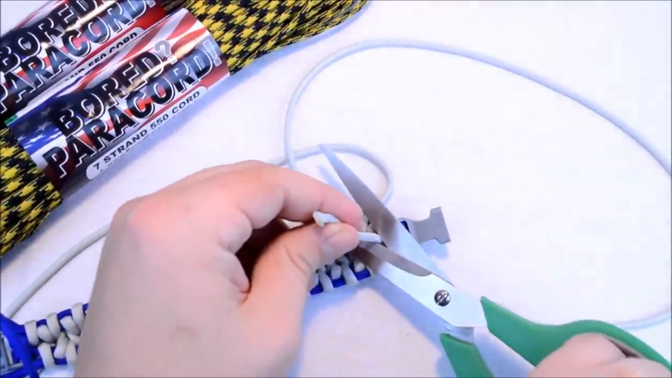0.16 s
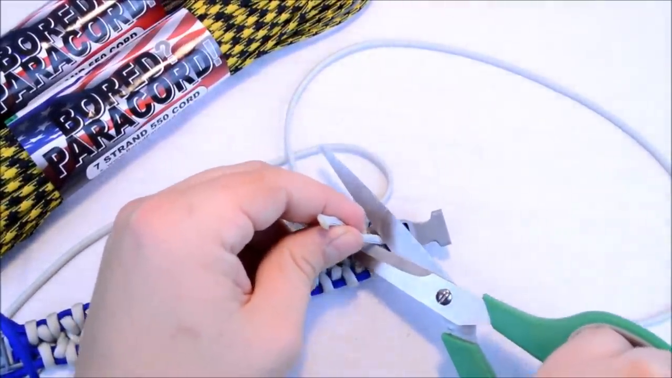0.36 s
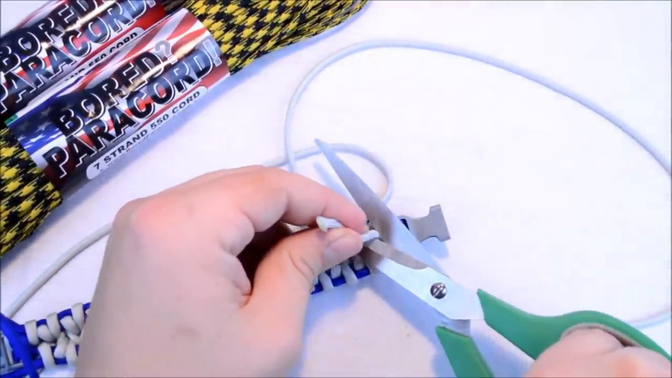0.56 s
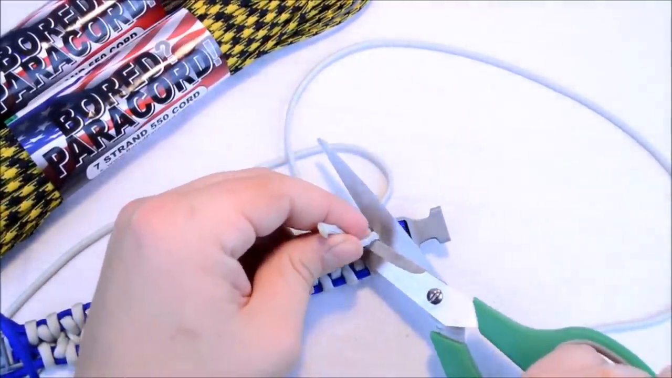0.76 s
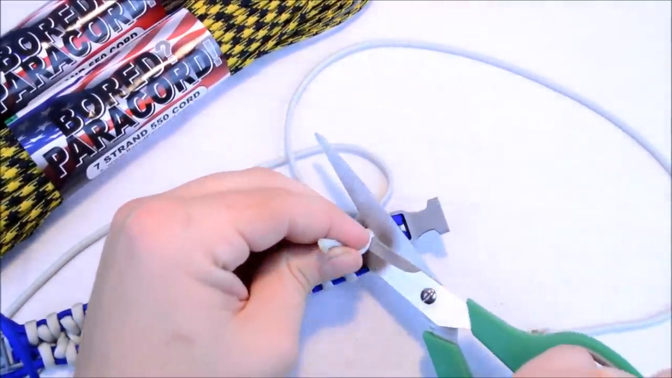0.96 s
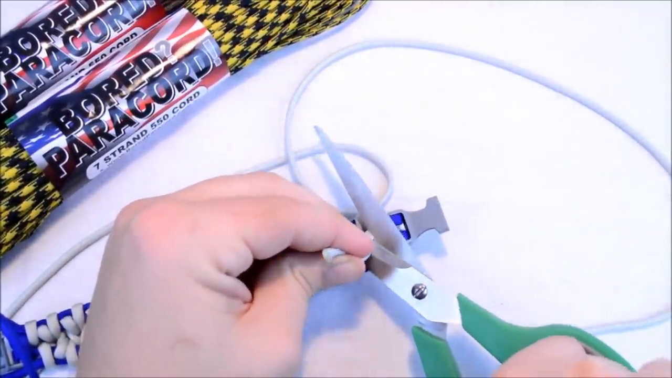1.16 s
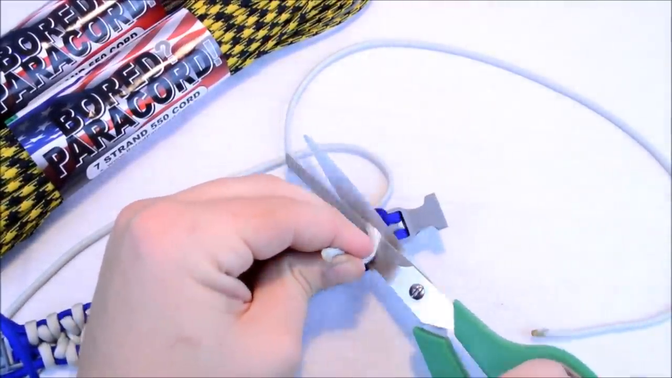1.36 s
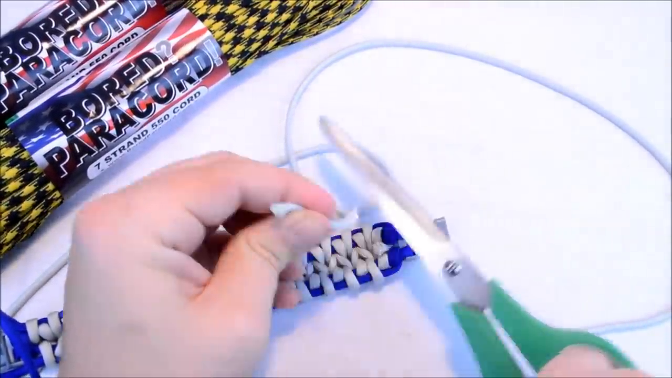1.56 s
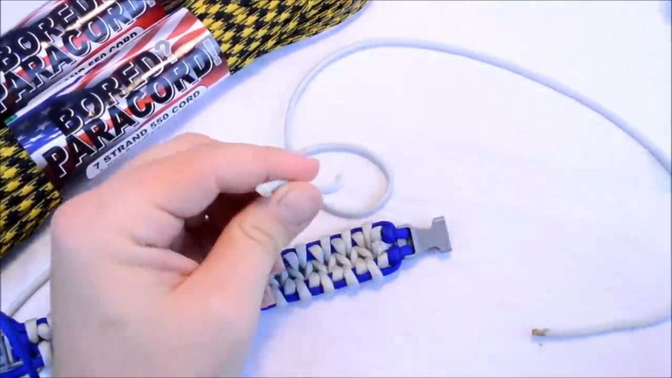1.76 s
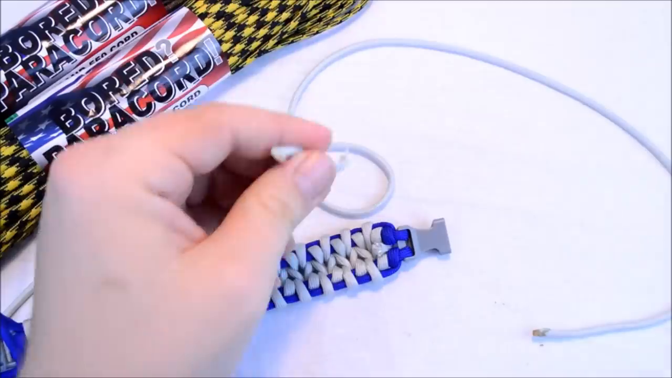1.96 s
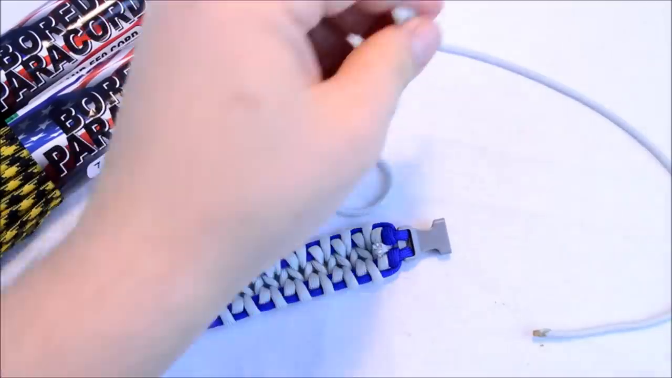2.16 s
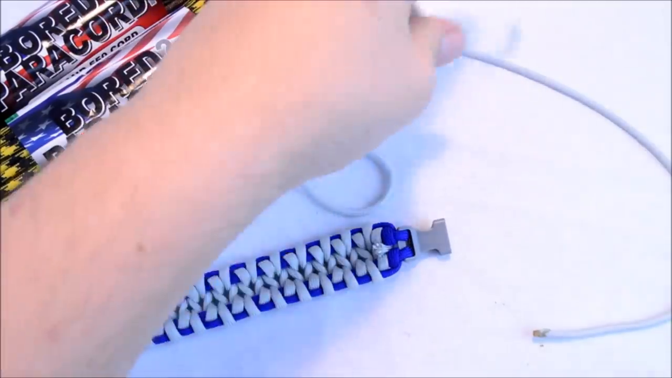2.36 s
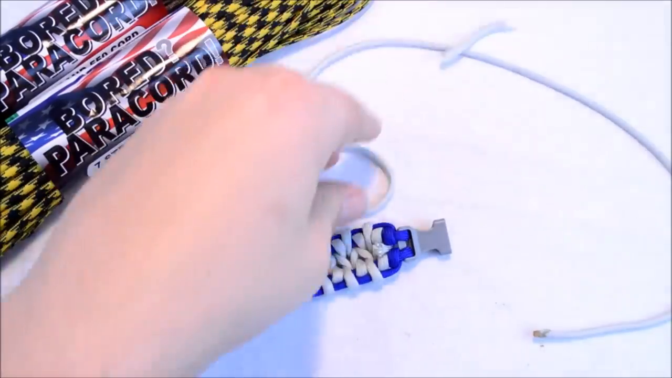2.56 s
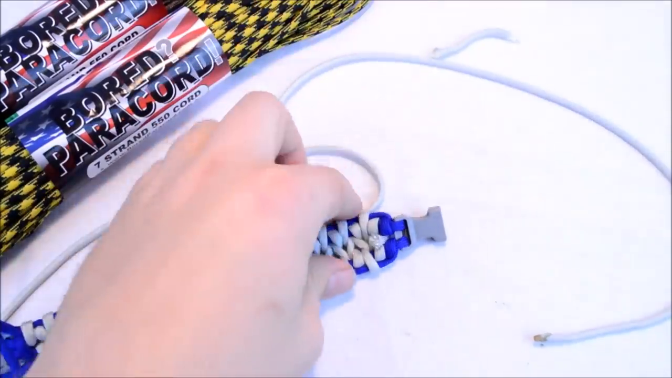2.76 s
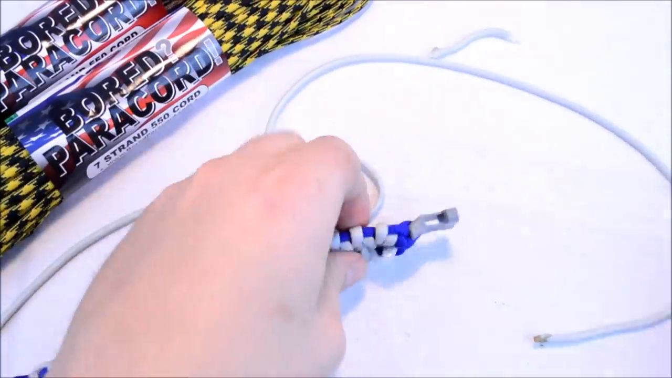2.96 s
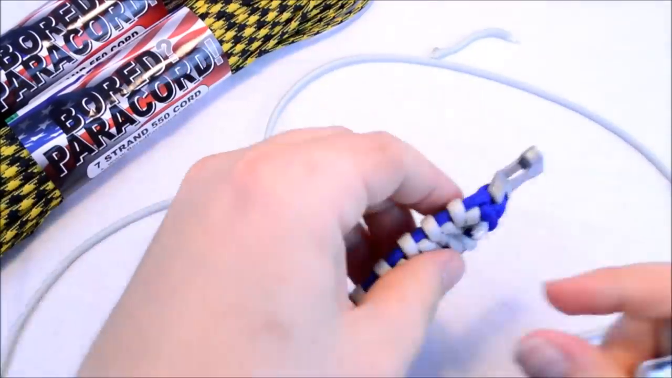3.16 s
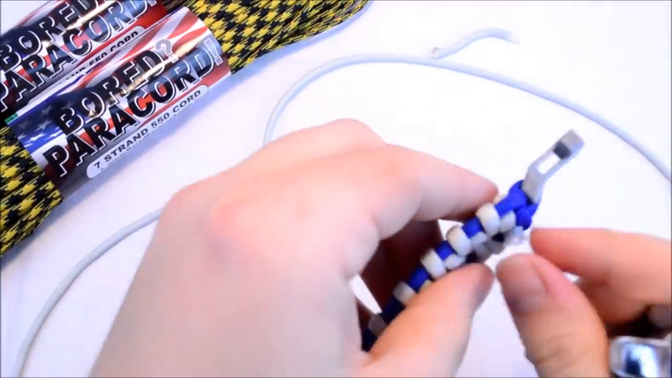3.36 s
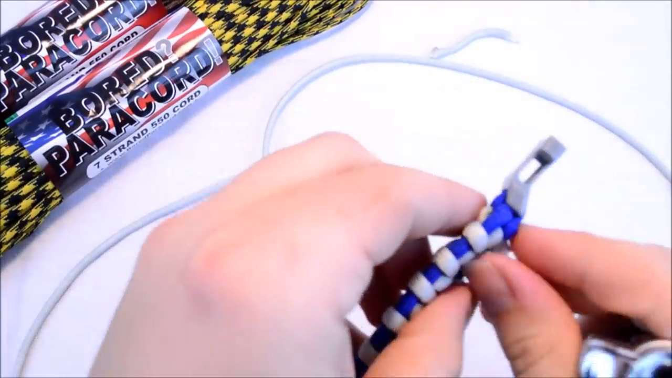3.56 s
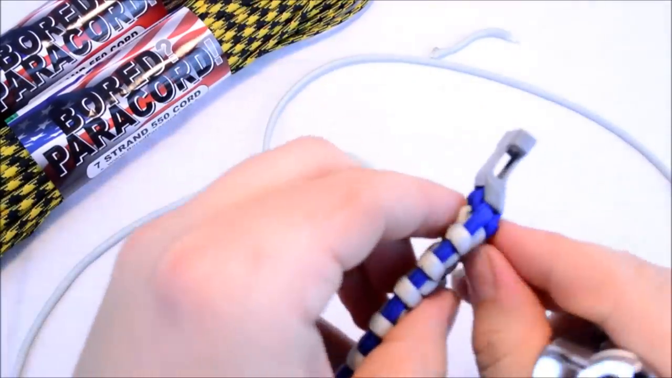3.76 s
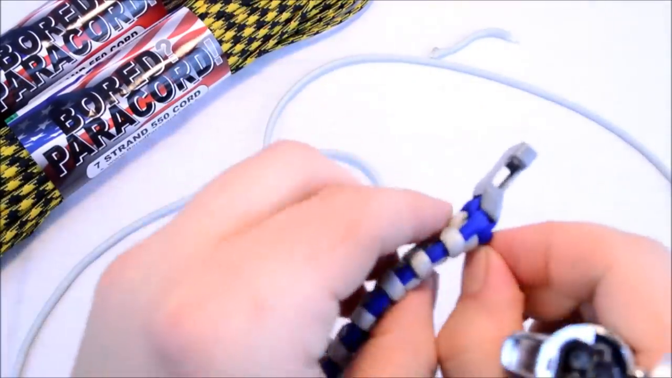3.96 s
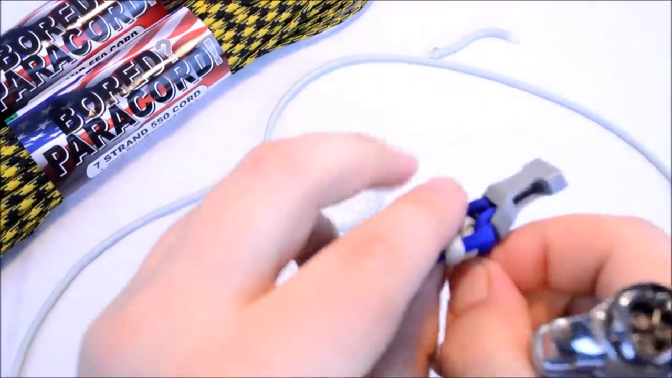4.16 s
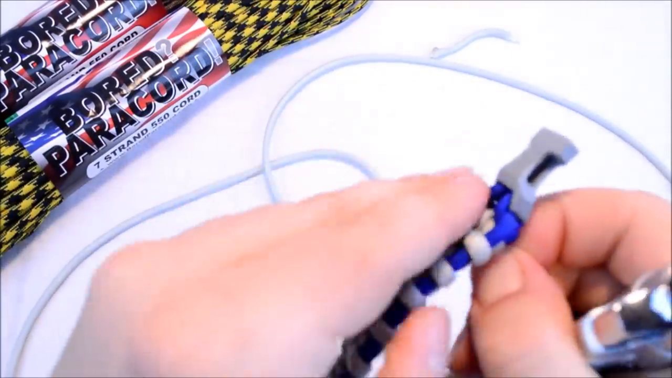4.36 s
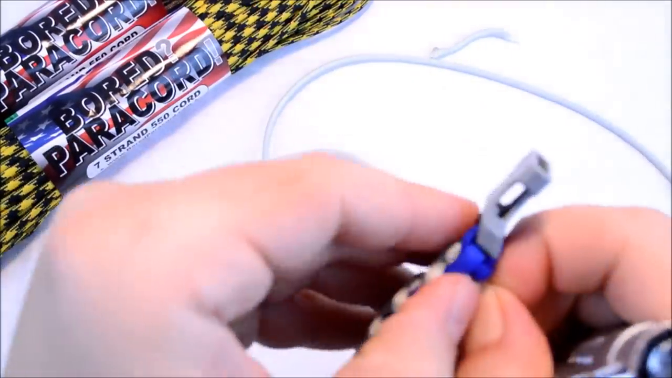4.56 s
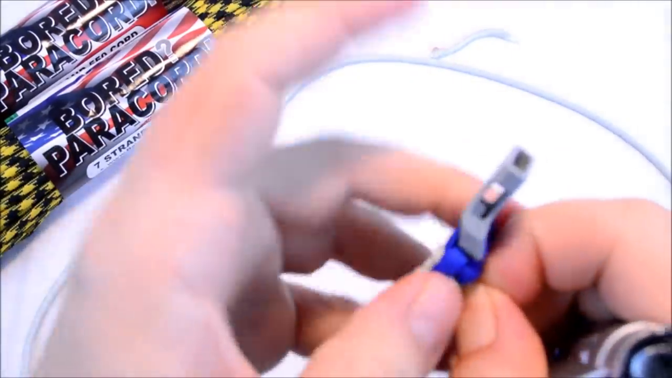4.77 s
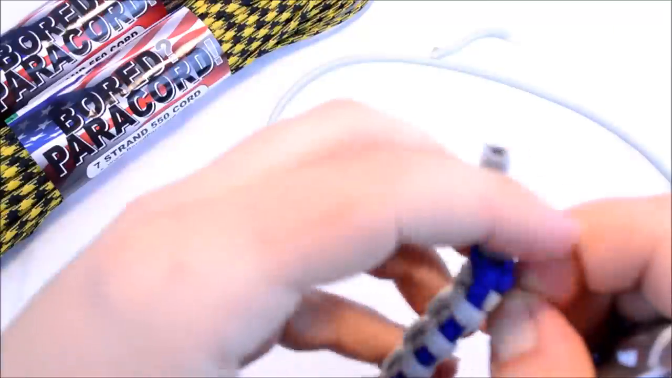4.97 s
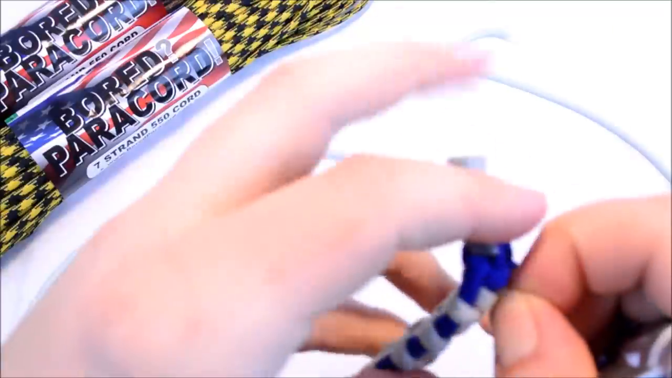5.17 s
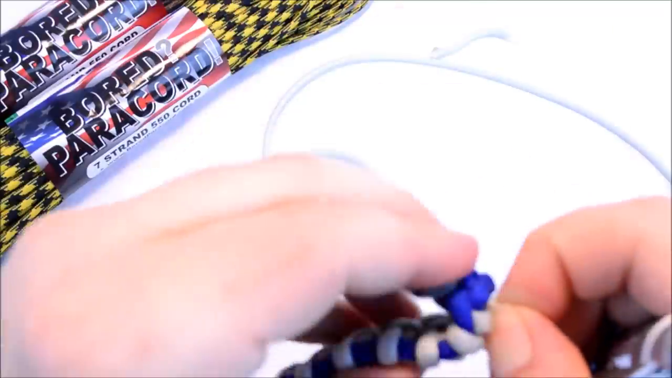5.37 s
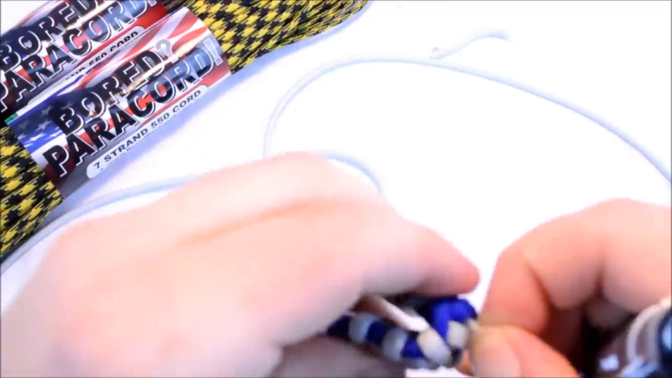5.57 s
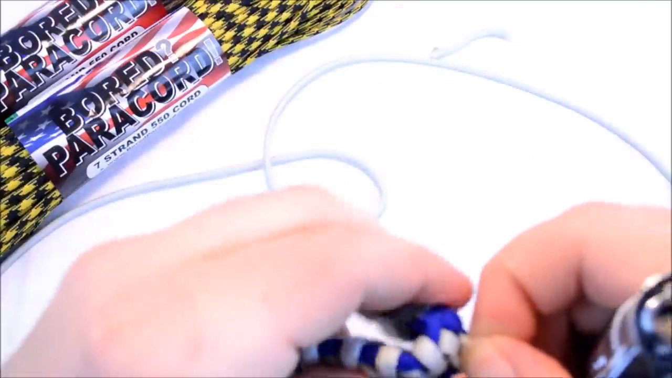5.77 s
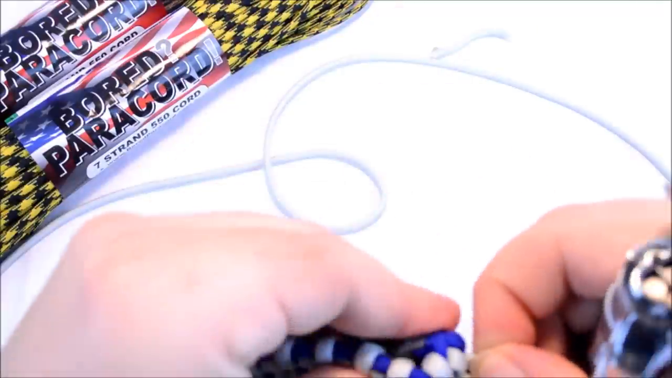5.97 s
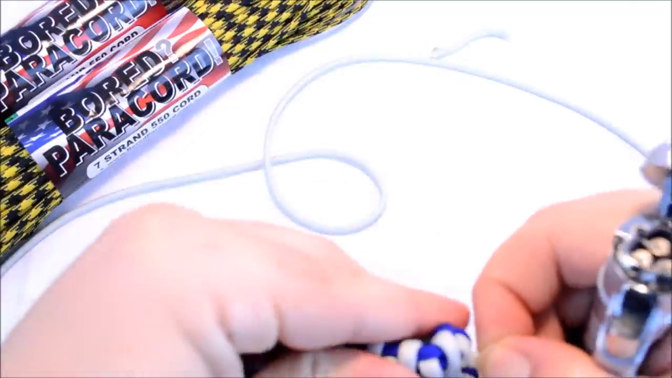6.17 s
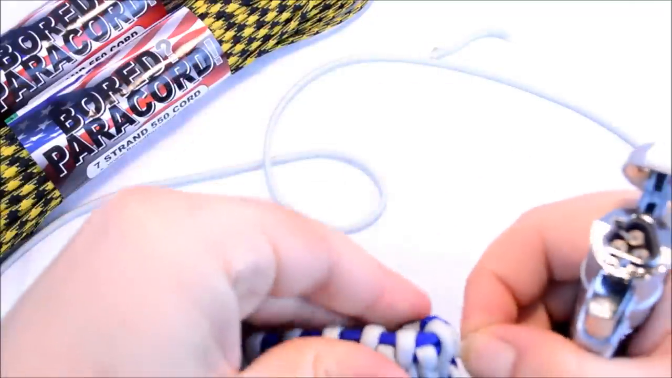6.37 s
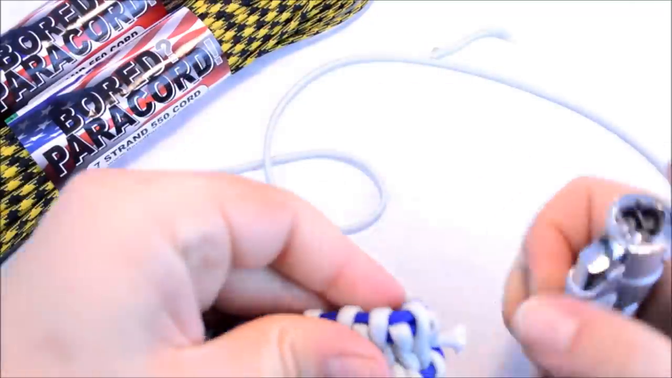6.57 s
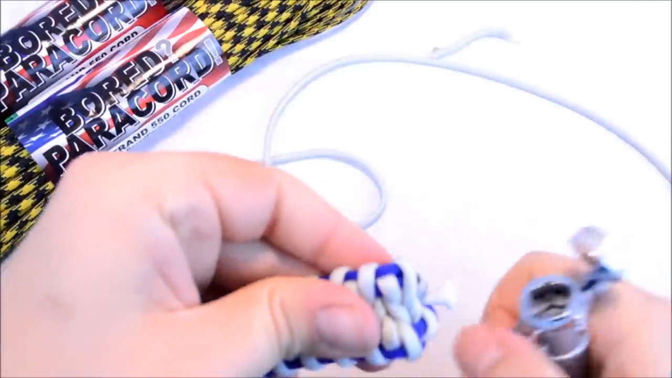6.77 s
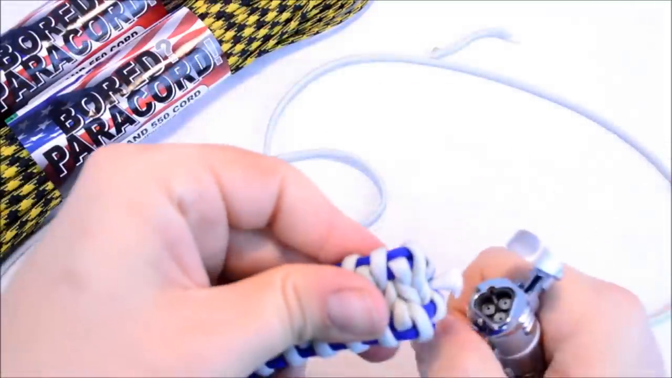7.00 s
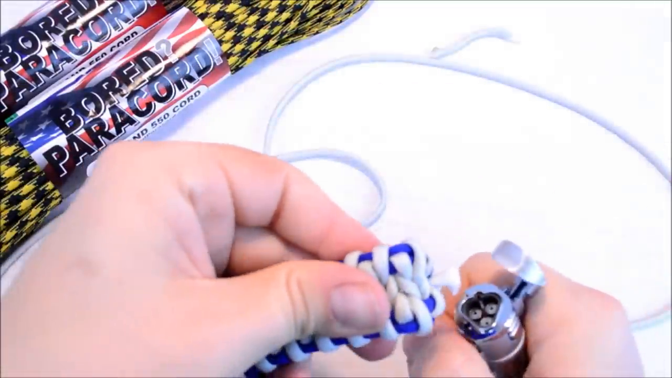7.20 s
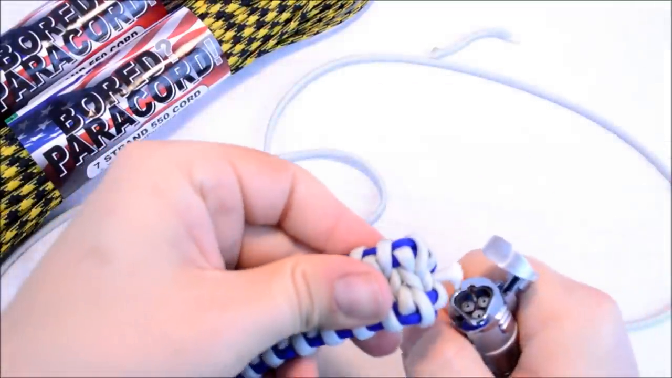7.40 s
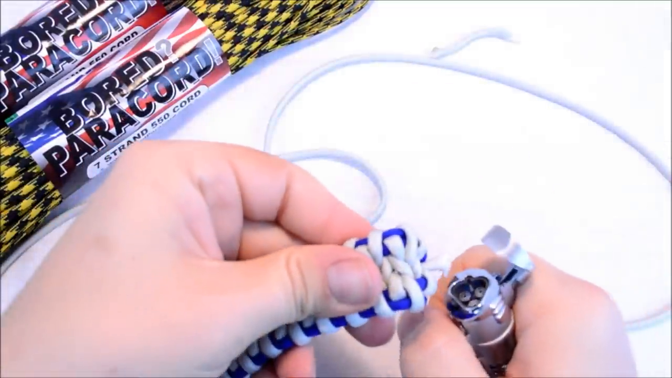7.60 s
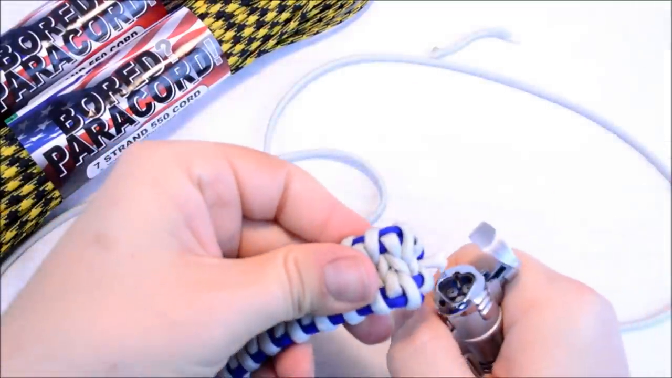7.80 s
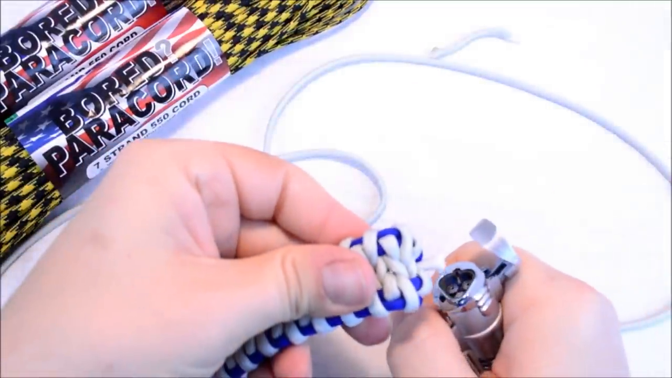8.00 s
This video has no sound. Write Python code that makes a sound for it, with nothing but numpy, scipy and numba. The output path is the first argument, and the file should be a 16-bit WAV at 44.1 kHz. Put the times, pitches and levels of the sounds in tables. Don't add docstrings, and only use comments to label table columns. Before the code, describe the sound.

In a quiet humming room, hands rub cord on a wooden bench. Scissors crunch through it with crisp snaps, then are dropped with loud, ringing, overloaded knocks. Softer rustles, wrist taps, buckle squeaks and small metal ticks follow. Finally gas hisses briefly, a sharp spark cracks and a torch flame roars steadily to the end. Close camera microphone, mono, with hiss and a faint thin whine.

```python
import sys
import numpy as np
from scipy import signal
from scipy.fft import rfft, irfft, next_fast_len
from scipy.io import wavfile
from scipy.ndimage import uniform_filter1d, map_coordinates
from numba import njit

SR = 44100
rng = np.random.default_rng(int(sys.argv[2]) if len(sys.argv) > 2 else 0)


def pcm_store(signal):
    levels = np.round(np.clip(np.atleast_2d(signal), -1, 1) * 32767)
    wavfile.write(sys.argv[1], SR, levels.astype(np.int16).T)


def ratio(d):
    e = np.asarray(d, float) / 20
    return 10 ** e


N = 354563
T = np.arange(N) / SR

# (frequency [Hz], density [dB/Hz])
ROOM_SPECTRUM = [(26, -27.5), (45, -1.5), (65, -4), (102, -10), (196, -7.5), (242, -6), (488, -6),
                 (693, -1.5), (876, -8), (984, -3.5), (2510, -8), (3240, -6), (3560, -2), (4190, -9.5),
                 (12000, -20), (15600, -49), (22000, -120)]
# (centre [Hz], width [Hz], level [dB])
WHIRR_BANDS = [(3483, 45, -65), (3640, 190, -64), (3900, 120, -70), (1300, 184, -69)]
# (frequency [Hz], level [dB rms])
HUM_OVERTONES = [(120, -74.5), (180, -78), (240, -74)]
# (time [s], level [dB])
HAND_EFFORT = [(0, -57), (.25, -59.5), (.85, -70), (1.3, -59), (1.65, -72), (1.86, -59.5), (2.2, -62),
               (2.6, -51.5), (2.7, -57), (3.04, -51), (3.3, -59), (3.9, -64), (4.4, -62), (4.93, -65),
               (5.58, -58.5), (5.9, -67), (6.95, -66.5), (7.3, -58.5)]
# (frequency [Hz], density [dB/Hz])
SKIN_SPECTRUM = [(880, -40), (1500, 1.5), (2170, 5), (2440, 4), (3540, -0.5), (5500, 0), (10100, -14.5),
                 (15100, -31), (15500, -14)]
# (frequency [Hz], density [dB/Hz])
RUMBLE_SPECTRUM = [(18, -36), (30, -19), (144, 0), (207, -3.5), (418, -2.5), (673, -14), (964, -6.5),
                   (1500, -13.5), (1950, -52), (3300, -120)]
# (middle [s], length [s], level [dB], brightness [higher = less low rustle,
# more treble])
CORD_STROKES = [(1.184, 0.1, -63, -2), (1.972, 0.16, -67.5, -4), (2.359, 0.088, -41.5, 1.5),
                (2.431, 0.19, -40.5, 0.5), (2.308, 0.11, -62.5, -3), (2.49, 0.12, -63, -1),
                (2.58, 0.14, -58, -2.5), (2.707, 0.14, -62, -4), (2.836, 0.13, -60, -2.5),
                (2.94, 0.15, -56, -1.4), (3.07, 0.059, -56, -1), (3.227, 0.78, -68, -2.5),
                (4.324, .12, -62, 2), (4.4, 0.044, -64, 0), (4.492, 0.048, -57.5, 6), (4.8, .06, -66, 3),
                (4.942, 0.13, -66.5, 3), (5.636, 0.065, -71, -3.5), (5.841, 0.032, -54, 2.5),
                (6.232, 0.1, -56.5, 1.5)]
# (time [s], peak [dB], frequency [Hz])
LOW_THUDS = [(1.531, -32.5, 131), (2.21, -21, 45), (2.92, -29, 45.3), (2.901, -26.5, 136),
             (2.951, -28.5, 255), (3.191, -38.5, 278), (4.52, -46, 139), (4.63, -45.5, 141.6),
             (7.128, -40, 141), (7.311, -41.5, 272), (7.4, -43, 277), (7.499, -19, 151),
             (7.48, -18, 219.4), (.05, -45.5, 256), (.17, -52, 400), (1.94, -33, 642),
             (2.621, -48, 352)]
# (time [s], peak [dB], upper modes [dB/octave])
WRIST_TAPS = [(0.179, -38.5, 11), (0.466, -45, -5), (3.419, -32.5, -6.5), (3.659, -41.5, -8),
              (4.191, -38, -2), (4.342, -44, -9), (4.511, -37.5, -2), (4.564, -39, 1), (4.757, -38.5, -5.5),
              (5.135, -29.5, -7.5), (5.336, -39, -7), (5.539, -34, -5.5), (5.641, -42, -4)]
# (frequency [Hz], level [dB], t60 [s])
TAP_MODES = [(213, -7.5, 0.25), (581.5, 10.5, 0.088), (825, -3, 0.11), (1010, 7.5, 0.092)]
# (time [s], peak [dB], centre [Hz], dull part [dB])
METAL_TICKS = [(0.1814, -44, 8320, -1), (0.4693, -36.5, 9400, -11), (3.8796, -33, 10280, -18),
               (3.9444, -41.5, 9660, -11), (3.9679, -42, 8360, -4), (4.2756, -30, 9300, -17),
               (4.9005, -27.5, 10140, -10), (5.543, -36, 9200, -12), (5.4294, -42, 10500, -15),
               (5.953, -38.5, 9750, -11.5), (7.1462, -28, 9880, -6), (7.153, -42, 9500, -2.5)]
# (time [s], peak [dB], centre [Hz], dull part [dB])
PLASTIC_CLACKS = [
    (0.8265, -39.5, 9950, -6),
    (1.5782, -31.5, 7000, -1),
    (1.932, -28, 9950, -7),
    (3.0654, -29, 7010, -6),
    (4.2144, -33.5, 5600, -3),
    (4.561, -42, 6500, -10),
    (7.2095, -33, 9030, -4.5),
]
# (time [s], peak [dB], frequency [Hz], t60 [s])
NARROW_SQUEAKS = [(1.158, -42, 10300, 0.16), (1.225, -50, 10300, .15), (2.962, -32, 6400, 0.05),
                  (2.967, -36, 6300, 0.04), (2.975, -29, 6500, 0.04), (2.978, -33, 5520, 0.067),
                  (3.067, -41, 2390, 0.11), (3.4, -38, 3950, .05), (3.205, -42.5, 2200, .08),
                  (5.276, -37.5, 10000, 0.077), (1.578, -28, 2100, .02), (1.5785, -33, 2800, .016),
                  (1.523, -22, 6600, .008), (4.279, -37, 6200, .03), (4.905, -42, 10300, .1),
                  (5.638, -38, 2950, .06), (4.901, -36, 3880, 0.043)]
# (start [s], hardest [s], level [dB], fading [dB/s])
BLADE_BITES = [
    (1.467, 1.508, -33.5, 1000),
    (1.522, 1.531, -38, 600),
    (1.545, 1.562, -48, 600),
    (1.577, 1.582, -50, 400),
]
# (frequency [Hz], density [dB/Hz])
BLADE_SPECTRUM = [(2350, -50), (4000, -16), (5130, -7), (5460, -9), (6590, 0), (7050, -4), (7590, -13),
                  (10000, -3), (11000, -12), (15500, -23)]
# (centre [Hz], width [Hz])
BLADE_RINGS = [(5500, 150), (6900, 200), (9300, 250), (10500, 200)]
# (time [s], peak [dB], centre [Hz], t60 [s])
CRISP_SNAPS = [
    (1.4966, -12, 7000, .005),
    (1.4990, -10.5, 9500, .005),
    (1.5052, -16, 9500, .012),
    (1.5233, -10.5, 7800, .0035),
    (3.7600, -34, 9500, .005),
    (3.7660, -25, 9500, .009),
    (3.7710, -36, 9500, .012),
    (3.8860, -33, 7000, .012),
    (4.0640, -27, 9300, .005),
    (4.0725, -21, 9500, .005),
]
# (time [s], peak [dB], brightness [dB/octave], ring [1 = free], loudest region [Hz])
BENCH_KNOCKS = [(1.498, -36, 1.5, 1.5, 350), (1.932, -27, 1.5, 0.7, 500), (2.2062, -7, 1, .8, 1620),
                (2.248, -14.5, -1, .7, 400), (2.3555, -8, -0.9, .7, 404), (2.3716, -1, 2.5, 0.85, 1300),
                (2.412, -13, 1, .75, 600), (2.341, -26, .5, .5, 600), (2.3598, -8, 1, .5, 1100),
                (2.3775, -7, 2, .6, 1400), (2.455, -21, .5, .8, 700), (2.498, -27, 0, .5, 600),
                (2.8670, -29, -2.5, 1.14, 304), (2.977, -23, 0.5, 0.7, 910)]
# (frequency [Hz], density [dB/Hz])
BOARD_SPECTRUM = [(40, -41.5), (90, -14), (202, -6.5), (277, 0), (410, -1), (691, -8.5), (945, -7.5),
                  (1020, -7.5), (1510, -12.5), (2830, -19), (4190, -25.5), (5740, -30.5), (15500, -61.5)]
# (frequency [Hz], t60 [s])
BOARD_RING = [(60, 0.58), (160, 0.25), (420, 0.19), (1100, 0.21), (2900, 0.16), (6000, 0.11),
              (12000, 0.0973)]
# (frequency [Hz], level [dB], t60 [s])
BOARD_MODES = [(151, -3.5, 0.22), (197.5, -6, 0.25), (409, -2, 0.26), (510, -4, 0.2), (904, -2, 0.15),
               (990, -5.5, 0.3), (1572, -7.5, 0.17), (1690, -11, 0.18), (1798, -11.5, 0.24),
               (1852, -15.5, 0.27), (2256, -16.5, 0.16), (2580, -15.5, 0.14), (2665, -16, 0.14),
               (3521, -24, .16)]
# (frequency [Hz], level [dB], t60 [s])
LOADED_MODES = [(200.8, -1, 0.38), (261.6, -13, 0.42), (353, -6, 0.24), (422, 5, 0.21), (608, -2, 0.23),
                (930, -4, 0.12), (1090, -9, 0.17), (1188, -8.5, 0.198), (1263, -3.5, 0.14),
                (1410, -15.5, 0.2), (1480, -4.5, 0.1804), (1890, -17.5, .2), (2175, -14.5, 0.111),
                (3720, -11.5, 0.09)]
# (time [s], peak [dB], frequency [Hz], t60 [s])
EDGE_CONTACTS = [(2.2063, -5, 800, 0.01), (2.3718, -3, 800, .012), (2.8672, -25.5, 530, 0.012),
                 (1.9325, -30, 660, .012), (2.2069, -11, 2630, .03), (2.2075, -16, 2200, .06),
                 (2.209, -14, 400, .2), (2.212, -17, 432, .2), (2.21, -24, 105, .15),
                 (2.2065, -20, 1798, .3), (2.2065, -24, 1740, 0.28), (2.2066, -13.5, 1572, 0.11),
                 (2.2066, -14, 299, .15), (2.3575, -9, 355, .16), (2.3592, -8, 434, .14),
                 (2.3555, -9, 1090, 0.067), (2.3556, -15, 2400, .04), (2.43, -22, 205, .3),
                 (2.372, -11.5, 1302, .2), (2.372, -12, 946, .2), (2.372, -19, 758, .2),
                 (2.374, -19, 830, .2), (2.372, -14, 2175, 0.1303), (2.372, -18, 2563, 0.17),
                 (2.372, -24, 142.9, .6), (2.867, -35.5, 300, 0.14), (2.8672, -39.5, 820, .08),
                 (1.499, -38.5, 330, 0.21), (1.932, -37, 239, 0.14)]
# (frequency [Hz], density [dB/Hz])
JET_SPECTRUM = [(880, -51), (1500, -16), (1810, -23.5), (1950, -5), (2200, -10.5), (3540, -6.5),
                (4440, -19), (6820, -10), (7450, -6.5), (9600, -1), (11200, -4.5), (15100, -27),
                (15500, -15.5)]
# (centre [Hz], width [Hz])
NOZZLE_PEAKS = [(6380, 48), (7400, 120), (8550, 41), (9540, 80), (10600, 92), (11000, 120), (12400, 130)]
# (frequency [Hz], density [dB/Hz])
SPARK_SPECTRUM = [(35, -39), (110, -10), (300, -5.5), (500, -19), (1020, -25.5), (1200, -15), (1520, -21),
                  (1830, -0.5), (2650, -11.5), (3840, -9), (5450, -13.5), (8280, -6), (9740, -8.5),
                  (10400, 4.5), (11700, -16.5), (15500, -17)]
# (frequency [Hz], t60 [s])
CASE_RING = [(100, 0.083), (300, 0.2), (2000, 0.14), (5000, 0.12), (10000, 0.098), (16000, .08)]
# (frequency [Hz], level [dB], t60 [s])
CASE_MODES = [(1910, -7, 0.17), (2110, -12, .1), (4013, -11, 0.1), (6800, -8.5, .05), (7806, -10.5, 0.054),
              (8200, -13.5, 0.08), (8726, -17, 0.1), (9250, -15, 0.088), (10280, -8, 0.11),
              (10330, -0.5, 0.06), (10580, -3, 0.1), (10830, -9.5, .09), (11030, -11.5, 0.06),
              (12800, -21, 0.11)]
# (frequency [Hz], density [dB/Hz])
ROAR_SPECTRUM = [(35, -50), (60, -24), (87, -32), (215, -13.5), (320, -17), (394, -14), (521, -15.5),
                 (829, -7.5), (953, -13), (1520, -1.5), (2360, -8), (4630, -22.5), (8670, -26),
                 (10800, -23), (15500, -37)]
# (centre [Hz], width [Hz])
BURNER_PEAKS = [(395, 30), (840, 35), (1510, 100), (2030, 90), (2600, 60), (3160, 26), (3370, 45),
                (3930, 54), (4950, 140), (5870, 100), (6750, 73), (8250, 130), (9950, 180), (11100, 250)]

ROOM_DB, HUM_DB, MOTOR_DB = -56, -70.5, -76
MAINS_HZ, SLIP_HZ, IN_STEP_S = 60, 0.7, 5.3
RUSTLE_DB, RUSTLE_SLOPE = -68, 0.54
SOFT_CONTACT_MS = 15.0
TICK_T60_S, METAL_DULL_HZ, PLASTIC_DULL_HZ, SNAP_DULL_DB = 0.02, 3480, 2216, -16
DULL_DB, DULLING_DB_PER_S = -12.5, 110
HARD_BLOW_DB = 7
VALVE_S, GAS_DB, GAS_JUMP, GAS_FILL_S = 7.207, -45, 0.5, 0.046
JET_SAG = 0.06
SPARK_S, SPARK_DB = 7.4752, 12
FLAME_DB, FLARE_DB, FLARE_S = -35.5, 9, 0.052
PUFF_DB, PUFF_S = -16.5, 0.0025
FLAME_DRIFT, FLAME_SPLIT_HZ = 0.006, 2800
HISS_DB, WHINE_DB, WHINE_HZ = -62.5, -64.5, 15667.7


def on_log(table, hz):
    f, v = np.transpose(table)
    return np.interp(np.log(hz), np.log(f), v)


def walk(rate_hz):
    k = int(SR / rate_hz)
    held = np.repeat(rng.standard_normal(N // k + 1), k)
    return uniform_filter1d(uniform_filter1d(held, k), k)[:N]


def colour(x, gain):
    n = next_fast_len(N)
    hz = np.arange(1, n // 2 + 2) * SR / n
    y = irfft(rfft(x, n) * gain(hz), n)[:N]
    return y / np.sqrt(np.mean(y ** 2))


def shape(table):
    return lambda hz: ratio(on_log(table, hz))


def peak(hz, centre_hz, width_hz):
    return 1 / np.sqrt(1 + (2 * (hz - centre_hz) / width_hz) ** 2)


def resonant(spectrum, peaks, lift):
    return lambda hz: ratio(on_log(spectrum, hz)) * (1 + lift * sum(peak(hz, f, 2 * w) ** 2 for f, w in peaks))


def gritty(spread_db, grains_per_s):
    grains = (rng.random(N) < grains_per_s / SR) * ratio(spread_db * rng.exponential(size=N))
    return rng.standard_normal(N) * (1 + uniform_filter1d(grains, size=16) * 16)


@njit
def add(out, start, hz, t60, gain, phase, rise):
    for f, t, g, a in zip(hz, t60, gain, phase):
        p = np.exp(2j * np.pi * f / SR - np.log(1000) / (t * SR))
        z = g * np.exp(1j * a)
        for i in range(min(int(t * SR), len(out) - start)):
            out[start + i] += z.imag * min(i / rise, 1.)
            z *= p


def strike(out, s, db, hz, t60, mode_db, rise_ms):
    chance = rng.random((2, len(hz)))
    gain = ratio(mode_db + 4 * (chance[0] - 0.5))
    gain = gain * ratio(db - 4.0) / np.sqrt(np.sum(gain ** 2))
    add(out, int(s * SR), hz, np.clip(t60, 0.004, 1), gain, 2 * np.pi * chance[1], rise_ms * SR / 1000)


def body(spectrum, ring, modes, modes_db, count):
    place = (np.arange(count) + rng.random(count)) / count
    hz = spectrum[0][0] + (spectrum[-1][0] - spectrum[0][0]) * place ** 2
    t60 = on_log(ring, hz) * (0.76 + 0.66 * rng.random(count))
    db = on_log(spectrum, hz) + 10 * np.log10(place / t60)
    f, strong_db, t = np.transpose(modes)
    return np.r_[hz, f], np.r_[t60, t], np.r_[db - db.max(), strong_db + modes_db]


def room():
    out = ratio(ROOM_DB + 0.77 * walk(2.7)) * colour(rng.standard_normal(N), shape(ROOM_SPECTRUM))
    for centre_hz, width_hz, db in WHIRR_BANDS:
        whirr = colour(rng.standard_normal(N), lambda hz: peak(hz, centre_hz, width_hz) ** 2)
        out += ratio(db + walk(5.6)) * whirr
    mains = 2 * np.pi * MAINS_HZ * T
    motor = mains - 2 * np.pi * SLIP_HZ * (T - IN_STEP_S)
    out += np.sqrt(2) * (ratio(HUM_DB) * np.sin(mains) + ratio(MOTOR_DB) * np.sin(motor))
    for hz, db in HUM_OVERTONES:
        out += ratio(db + 1.5 * walk(1.8)) * np.sqrt(2) * np.sin(2 * np.pi * (hz * T + rng.random()))
    return out


def rubbing():
    skin = gritty(1.478, 2800)
    rustle = colour(skin, shape(SKIN_SPECTRUM))
    bright = colour(skin, lambda hz: peak(hz, 9800, 5200) ** 3)
    rumble = colour(gritty(1.0, 300), shape(RUMBLE_SPECTRUM)) * ratio(2.5 * walk(15))
    effort_db = np.interp(T, *np.transpose(HAND_EFFORT))
    out = ratio(effort_db) * rumble + ratio(RUSTLE_DB + RUSTLE_SLOPE * (effort_db + 61.5)) * bright
    for s, length_s, db, tilt_db in CORD_STROKES:
        swell = np.clip(1 - (2 * (T - s) / length_s) ** 2, 0, 1) ** 1.8 * ratio(0.88 * walk(40))
        out += ratio(db) * swell * (ratio(-3.0 * tilt_db) * rustle + ratio(0.52 * tilt_db) * bright)
    return out


def thuds():
    out = np.zeros(N)
    for s, peak_db, low_hz in LOW_THUDS:
        hz = low_hz * np.array([0.85, 1, 1.12])
        strike(out, s, peak_db, hz, np.full(3, 0.17), np.array([-6, 0, -6]), 11.0)
    return out


def taps():
    out = np.zeros(N)
    hz, db, t60 = np.transpose(TAP_MODES)
    for s, peak_db, upper_db in WRIST_TAPS:
        tilted_db = db + upper_db * np.log2(hz / 200)
        for lag_s, bounce_db in [(0, 7), (0.022, -2)]:
            start_s = s + lag_s - SOFT_CONTACT_MS / 2000
            spot_hz = hz * (0.96 + 0.078 * rng.random(len(hz)))
            strike(out, start_s, peak_db + bounce_db, spot_hz, 0.59 * t60, tilted_db, SOFT_CONTACT_MS)
    return out


def tick(out, s, peak_db, centre_hz, t60, dull_db, dull_hz, skirt_db=18.0):
    hz = 3500 + 12000 * rng.random(120)
    tail = np.arange(120) % 2
    db = -skirt_db * abs(np.log2(hz / centre_hz)) - 6.7 * tail - 3.3 * np.clip(hz / 1000 - 11, 0, 9)
    s = s + 0.0007
    strike(out, s, peak_db, hz, t60 * (0.5 + 3.3 * tail), db, 0.15)
    hz = dull_hz * np.r_[1, 2 ** (2.0 * rng.random(15) - 1.3)]
    strike(out, s, peak_db + dull_db, hz, np.full(16, 1.6 * t60), np.r_[1.5, np.zeros(15)], 0.3)


def ticks():
    out = np.zeros(N)
    for s, peak_db, centre_hz, dull_db in METAL_TICKS:
        tick(out, s, peak_db, centre_hz, TICK_T60_S, dull_db, METAL_DULL_HZ, skirt_db=22.0)
    for s, peak_db, centre_hz, dull_db in PLASTIC_CLACKS:
        tick(out, s, peak_db, centre_hz, TICK_T60_S, dull_db, PLASTIC_DULL_HZ, skirt_db=12.0)
    return out


def squeaks():
    out = np.zeros(N)
    for s, peak_db, centre_hz, t60 in NARROW_SQUEAKS:
        hz = centre_hz * (0.94 + 0.09 * rng.random(16))
        strike(out, s, peak_db, hz, np.full(16, t60), np.zeros(16), 1.7)
    return out


def shearing():
    bite = np.zeros(N)
    for start_s, top_s, db, fade_db in BLADE_BITES:
        swell = np.clip((T - start_s) / (top_s - start_s), 0, 1) ** 0.45
        bite += swell * ratio(db - fade_db * np.clip(T - top_s, 0, 1))
    grind = gritty(0.8, 14000)
    dull = ratio(DULL_DB + DULLING_DB_PER_S * np.clip(T - BLADE_BITES[0][0], 0, 0.15))
    edge = colour(grind, resonant(BLADE_SPECTRUM, BLADE_RINGS, 0.8)) * np.sqrt(ratio(DULL_DB) / dull)
    return bite * (edge + dull * colour(grind, lambda hz: peak(hz, 1700, 3400) ** 2))


def snaps():
    out = np.zeros(N)
    for s, peak_db, centre_hz, t60 in CRISP_SNAPS:
        tick(out, s, peak_db, centre_hz, t60, SNAP_DULL_DB, METAL_DULL_HZ)
    return out


def knocks():
    out = np.zeros(N)
    for s, peak_db, tilt_db, ring, spot_hz in BENCH_KNOCKS:
        modes = LOADED_MODES if 2.3 < s < 2.45 else BOARD_MODES
        hz, t60, db = body(BOARD_SPECTRUM, BOARD_RING, modes, 10.5, count=600)
        db = db + tilt_db * np.log2(hz / 500) + 3.8 * peak(hz, spot_hz, 0.75 * spot_hz)
        strike(out, s, peak_db + HARD_BLOW_DB * (peak_db > -15), hz, ring * t60, db, 0.79)
    return out


def contacts():
    out = np.zeros(N)
    for s, peak_db, hz, t60 in EDGE_CONTACTS:
        gain = np.array([ratio(peak_db)])
        add(out, int(s * SR), np.array([1. * hz]), np.array([t60]), gain, np.zeros(1), 4.)
    return out


def gas_jet():
    jet = colour(rng.standard_normal(N), resonant(JET_SPECTRUM, NOZZLE_PEAKS, 1.3)) * ratio(0.7 * walk(30))
    open_s, lit_s = np.maximum(T - VALVE_S, 0), np.maximum(T - SPARK_S, 0)
    fill = 1 - (1 - GAS_JUMP) * np.exp(-open_s / GAS_FILL_S)
    flow = np.clip(open_s / 0.008, 0, 1) * fill * np.exp(-lit_s / 0.008)
    jet = np.interp(T + JET_SAG * 0.12 * np.exp(-open_s / 0.12), T, jet)
    return ratio(GAS_DB + 1.5) * flow * jet


def spark():
    out = np.zeros(N)
    hz, t60, db = body(SPARK_SPECTRUM, CASE_RING, CASE_MODES, -1.5, count=700)
    strike(out, SPARK_S, SPARK_DB - 7.0, hz, t60, db, 0.15)
    strike(out, SPARK_S, SPARK_DB + 2.0, hz, 0.33 * t60, db, 0.37)
    return out


def flame():
    roar = colour(rng.standard_normal(N), resonant(ROAR_SPECTRUM, BURNER_PEAKS, 1.3))
    drift = np.cumsum(FLAME_DRIFT * walk(25))
    roar = map_coordinates(roar, [np.arange(N) + drift], mode="mirror")
    low = signal.sosfilt(signal.butter(2, FLAME_SPLIT_HZ, fs=SR, output="sos"), roar)
    high = roar - low
    roar = low * ratio(0.95 * walk(14) + 1.3 * walk(90)) + high * ratio(0.7 * walk(20) + 0.71 * walk(90))
    lit_s = np.maximum(T - SPARK_S, 0)
    burn = np.clip(lit_s / 0.015, 0, 1) * ratio(FLAME_DB + FLARE_DB * np.exp(-lit_s / FLARE_S))
    puff = ratio(PUFF_DB) * lit_s / PUFF_S * np.exp(1 - lit_s / PUFF_S)
    return burn * roar + puff


def scene():
    hands = rubbing() + thuds() + taps() + ticks() + squeaks()
    scissors = shearing() + snaps() + knocks() + contacts()
    lighter = gas_jet() + spark() + flame()
    return (room() + hands + scissors + lighter)[None]


@njit
def gain_control(x, top, slope, attack, release):
    y, e = np.empty(len(x)), 0.
    for i in range(len(x)):
        e += (abs(x[i]) - e) * (attack if abs(x[i]) > e else release)
        y[i] = x[i] * (top / max(e, top)) ** slope
    return y


def top_cut(x):
    return signal.sosfilt(signal.butter(12, 16060, fs=SR, output="sos"), x)


def record(dry):
    attack, release = 1 / (0.0059 * SR), 1 / (0.06 * SR)
    held = gain_control(dry[0], ratio(-22.0), 0.27, attack, release)
    held += ratio(HISS_DB) * colour(rng.standard_normal(N), lambda hz: hz / (hz + 2500))
    held += ratio(WHINE_DB) * np.sqrt(2) * np.sin(2 * np.pi * WHINE_HZ * T)
    held = signal.sosfilt(signal.ellip(8, 0.2, 50, 15950, fs=SR, output="sos"), held)
    return top_cut(np.clip(held, -1, 1)[None])


dry = scene()
out = record(dry)
pcm_store(out)
```